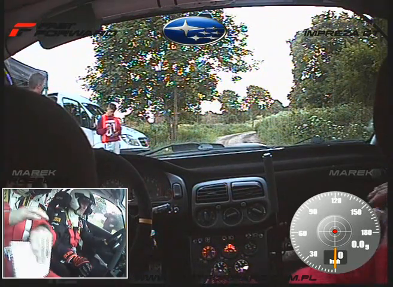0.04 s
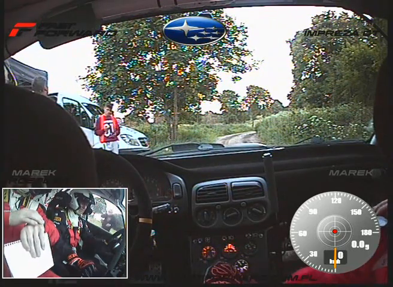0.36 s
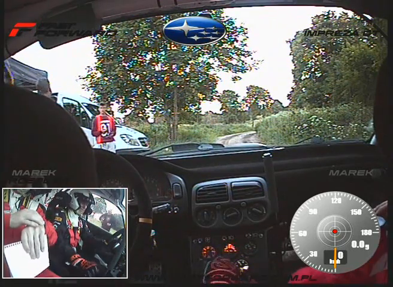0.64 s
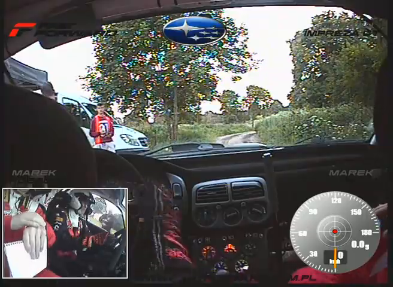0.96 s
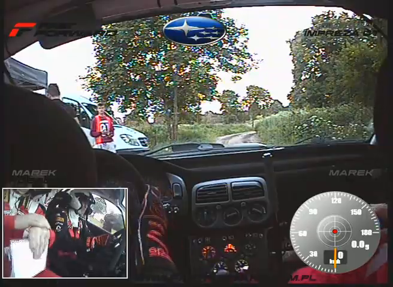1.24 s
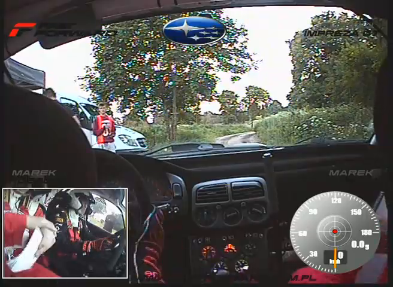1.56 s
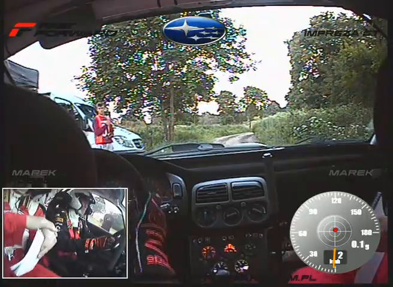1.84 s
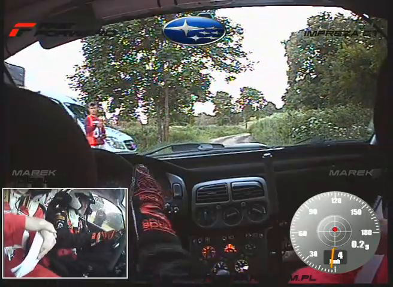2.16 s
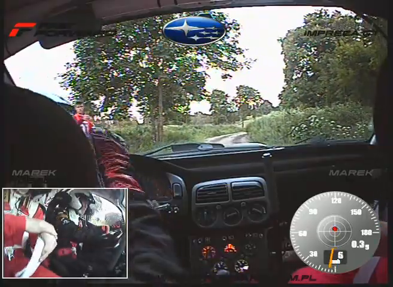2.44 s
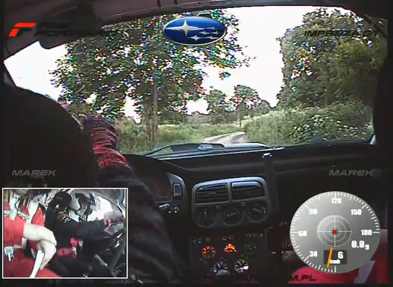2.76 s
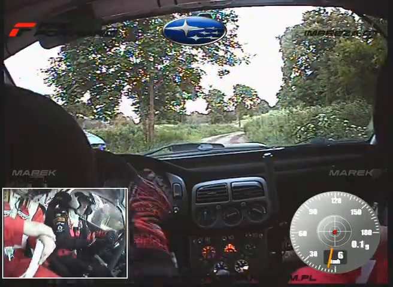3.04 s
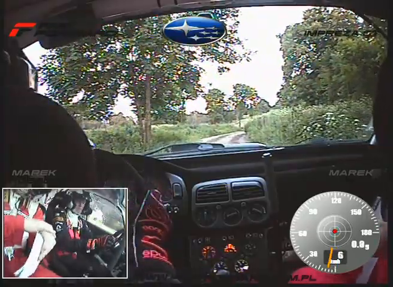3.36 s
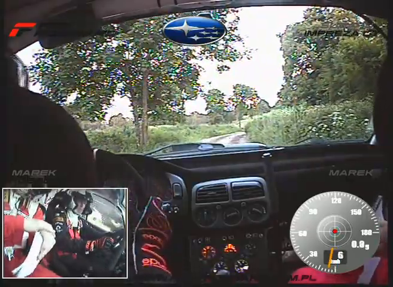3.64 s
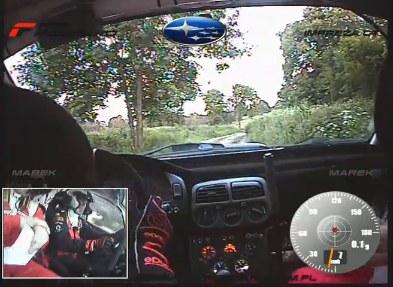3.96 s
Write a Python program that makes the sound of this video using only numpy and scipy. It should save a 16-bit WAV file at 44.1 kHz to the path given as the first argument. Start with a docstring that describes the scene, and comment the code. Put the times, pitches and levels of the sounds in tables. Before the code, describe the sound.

A rally car engine idles with a low rumble and light clatter, heard inside the cabin. At about 1 second it revs up and holds, booming, with a thin whine following its pitch and short rasps from the trim. From about 2.2 seconds the revs sag and the engine judders, quieter as the car rolls off. A brief rough surge comes near 3.7 seconds. Faint electrical hiss runs throughout.

```python
"""A rally car's flat-four engine, heard from inside: it idles, revs up, then sags and judders as the
clutch takes up and the car rolls off. The exhaust beat makes the cabin boom over rumble and clatter;
the trim rasps, and revving brings an intake growl and a thin ringing. The alternator whines in the
sound wiring, following engine speed, beside a faint electrical buzz and hiss.
The cabin sound reaches the right channel upside down (inverted), at half strength."""
import sys
import numpy as np
from scipy import signal
from scipy.fft import rfft, irfft
from scipy.io import wavfile
from scipy.ndimage import uniform_filter1d

SR = 44100
rng = np.random.default_rng(int(sys.argv[2]) if len(sys.argv) > 2 else 0)


def wav_record(signal):
    """Record a signal, one row per channel, as 16-bit PCM in the file named by sys.argv[1]."""
    frames = np.transpose(np.atleast_2d(signal))
    bounded = np.clip(frames, -1, 1)
    # unit amplitude maps onto the largest positive 16-bit level
    quanta = np.round(bounded * 32767).astype(np.int16)
    wavfile.write(sys.argv[1], SR, quanta)


N = 176400
T = np.arange(N) / SR

# what the engine is doing (time [s], state [0 idling, 1 revved, 2 rolling])
ENGINE_STATE = [(0, 0.14), (1.02, 0.044), (1.26, 0.98), (2.25, 0.97), (2.65, 1.84), (3.55, 2), (3.75, 1.68),
                (4, 1.53)]


def amp(db):
    """Turns decibels into a number to multiply by."""
    return 10 ** (np.asarray(db) / 20)


def unit(x):
    """Scales a signal to an average strength (rms) of 1."""
    return x / np.sqrt(np.mean(x ** 2) + 1e-20)


def curve(points):
    """Joins (time, value) points with straight lines."""
    return np.interp(T, *np.transpose(points))


def level_at(spectrum, hz):
    """Looks up a spectrum's level in dB at a given frequency."""
    f, db = np.transpose(spectrum)
    return np.interp(np.log(hz + 1), np.log(f + 1), db)


def noise(spectrum):
    """Noise of strength 1, its lows and highs shaped by a spectrum."""
    gain = amp(level_at(spectrum, np.fft.rfftfreq(N, 1 / SR)))
    return unit(irfft(rfft(rng.standard_normal(N)) * gain, N))


def wander(rate_hz):
    """Two smooth random wobbles, held as the real and imaginary parts of one signal."""
    f = np.fft.fftfreq(4096, N / SR / 4096)
    z = np.fft.ifft(np.exp(2j * np.pi * rng.random(len(f))) / (1 + (f / rate_hz) ** 4))
    return np.interp(T, np.linspace(0, N / SR, len(f)), unit(z.real) + 1j * unit(z.imag))


def wavering_tone(hz, width_hz):
    """Noise so narrow that it sounds like an unsteady note."""
    return (wander(width_hz / 2) * np.exp(2j * np.pi * hz * T)).real


def exhaust(cycle_hz, cycles):
    """The uneven exhaust beat: a stack of tones that slide through the cabin's resonances."""
    # tones (multiple of the cycle rate, relative level idling [dB], revved [dB], rolling [dB])
    tones = [(3, -50, -52, -43), (4, -44, -29, -36), (5, -60, -33, -47), (6, -60, -50, -50),
             (7, -55, -35, -50), (8, -38, -39, -45), (9, -56, -30, -48), (10, -58, -54, -54),
             (11, -42, -49, -48), (12, -41, -30, -51), (13, -57, -36, -49), (14, -60, -54, -55),
             (15, -52, -42, -54), (16, -46, -35, -58), (17, -49, -49, -56), (18, -64, -50, -57),
             (19, -64, -54, -54), (20, -51, -41, -55), (21, -57, -39, -54), (22, -64, -55, -52),
             (23, -55, -54, -53), (24, -44, -46, -55), (25, -54, -46, -56), (26, -64, -53, -57),
             (27, -60, -53, -57), (28, -62, -50, -57), (29, -60, -52, -57), (30, -68, -54, -57),
             (31, -48, -52, -56), (32, -52, -48, -56)]
    # how the cabin boosts or weakens each pitch (frequency [Hz], gain [dB])
    cabin_response = [(20, -18), (40, -4), (70, 0), (100, -1), (125, -3), (160, 8), (185, 0), (215, 3),
                      (245, -3), (275, -1), (320, -11), (345, -7), (362, 3), (382, -10), (450, -14),
                      (700, -24)]
    # how unevenly the fuel burns (time [s], roughness [0-1])
    roughness = [(0, .1), (1, .12), (1.18, .25), (1.35, .05), (2.1, .06), (2.4, .25), (3.5, .35),
                 (3.75, .6), (4, .6)]
    # loudness of the whole exhaust (time [s], level [dB])
    loudness = [(0, -35), (.97, -32), (1.1, -28), (1.18, -19), (1.24, -22), (1.38, -19), (1.75, -19),
                (2, -21), (2.3, -23.5), (2.5, -31.5), (2.7, -32), (3.25, -34.5), (3.35, -34), (3.5, -36.5),
                (3.75, -26.5), (4, -31)]
    state, rough = curve(ENGINE_STATE), curve(roughness)
    boom, power = np.zeros(N), np.zeros(N)
    for k, idle, revved, rolling in tones:
        db = idle + (revved - idle) * np.clip(state, 0, 1) + (rolling - revved) * np.clip(state - 1, 0, 1)
        gain = amp(db + level_at(cabin_response, k * cycle_hz))
        # every fourth tone stays in step with the firings
        phase = np.pi + rng.uniform(-np.pi, np.pi) * (k % 4 > 0)
        tone = np.exp(1j * (2 * np.pi * k * cycles + phase))
        boom += gain * (tone * (1 + rough * wander(rate_hz=5.7))).real
        power += gain ** 2 * (.5 + rough ** 2)
    return boom / np.sqrt(power) * amp(curve(loudness))


def cabin_drone():
    """The drivetrain shakes the cabin's air, which hums at its main resonance."""
    # loudness of the hum (time [s], level [dB])
    loudness = [(0, -40), (.95, -42), (1.17, -23.5), (1.35, -38.5), (2.15, -36.5), (2.35, -24.5),
                (2.55, -30), (2.75, -48), (3.05, -41), (3.45, -41.5), (3.8, -31.5), (4, -30.5)]
    return amp(curve(loudness)) * wavering_tone(hz=159.9, width_hz=31.5)


def rumble_and_clatter(firings):
    """The car's body rumbles and moving parts clatter, both swelling a little at each firing."""
    # tone colour of each (frequency [Hz], relative level [dB])
    rumble_spectrum = [(12, -25), (25, -9), (45, 2.5), (80, 4), (105, 1.5), (125, -8), (160, 1),
                       (220, -10.5), (270, -1.5), (320, -14.5), (430, -17), (560, -27.5), (1000, -57)]
    clatter_spectrum = [(150, -10.5), (300, 4.5), (430, 5.5), (520, -3), (680, -4), (850, -6.5),
                        (1100, -9.5), (1500, -6), (1680, -8), (1850, -13.5), (2400, -15), (3300, -21),
                        (5000, -25.5), (7800, -30), (9000, -36), (13000, -48)]
    # loudness of each (time [s], level [dB])
    rumble_loudness = [(0, -43), (.95, -44), (1.15, -32), (1.35, -41), (2.1, -36), (2.35, -28.5),
                       (2.7, -37), (3.5, -44), (3.75, -29.5), (4, -33.5)]
    clatter_loudness = [(0, -44.5), (1, -44.5), (1.4, -42), (2.2, -44), (2.7, -43.5), (3.5, -44.5),
                        (3.8, -43), (4, -44)]
    depth, decay = 0.078, 0.4  # decay is a share of the time between firings
    beat = unit(1 - depth + 2 * depth * np.exp(-(firings % 1) / decay))
    rumble = noise(rumble_spectrum) * amp(curve(rumble_loudness))
    clatter = noise(clatter_spectrum) * amp(curve(clatter_loudness))
    return beat * (rumble + clatter)


def alternator(hz):
    """Ripple in the charging current makes a whine that gets brighter as the engine speeds up."""
    # the whine's tones at top speed (multiple of the pitch, relative level [dB])
    harmonics = [(1, 0), (2, -4), (3, -5.5), (4, -6), (5, -7), (6, -13), (7, -7)]
    # loudness of the lowest tone (time [s], level [dB])
    loudness = [(0, -70.5), (1, -70), (1.2, -63.5), (1.35, -63), (2.1, -64.5), (2.4, -65.5), (2.65, -66),
                (3, -66.5), (3.2, -69.5), (3.65, -73), (4, -69)]
    pitch_jitter, flutter, db_per_octave = 0.00202, 0.15, 6
    turns = np.cumsum(hz * (1 + pitch_jitter * wander(rate_hz=38).real)) / SR
    brightness = amp(db_per_octave * np.log2(hz / hz.max()))
    whine = np.zeros(N)
    for k, db in harmonics:
        gain = amp(db) * (brightness if k > 1 else 1)
        whine += gain * np.sin(2 * np.pi * k * turns) * (1 + flutter * wander(rate_hz=33).real)
    return np.sqrt(2) * whine * amp(curve(loudness))


def wiring():
    """Electrical noise in stereo: a pulsing high tone, a hiss that dips in its rhythm, and a buzz."""
    # tone colour of the hiss (frequency [Hz], relative level [dB])
    hiss_spectrum = [(100, 5), (1000, 5), (2500, 4), (4500, 0.5), (10000, -0.5), (12500, -0.5)]
    # steady tones of the buzz (frequency [Hz], level [dB])
    buzz_tones = [(4500, -87), (6000, -88), (7500, -88), (9000, -87), (10500, -88), (12000, -88)]
    pulse_db, hiss_db = (-73.5, -67), (-62, -61.5)  # left, right
    tone_hz, pulses_per_s, on_share = 11522, 20.15, .43
    place = T * pulses_per_s % 1  # runs from 0 to 1 once per pulse
    gate = uniform_filter1d(1. * (abs(place - .5) < on_share / 2), size=100)
    pulses = amp(pulse_db)[:, None] * np.sqrt(2) * gate * np.sin(2 * np.pi * tone_hz * T)
    flicker = 1 + 0.1 * wander(rate_hz=93).real
    dip = 1 - 0.47 * np.exp(-((place - 0.85) / 0.081) ** 2)
    hiss = np.array([amp(db) * noise(hiss_spectrum) for db in hiss_db]) * unit(flicker * dip)
    buzz = sum(amp(db) * np.sqrt(2) * np.sin(2 * np.pi * hz * T) for hz, db in buzz_tones)
    return pulses + hiss + buzz


def trim_rasps():
    """The cabin's trim panels vibrate in short, rasping bursts."""
    # bursts (middle [s], length [s], peak level [dB])
    rasps = [(0.558, 0.093, -57), (1.453, 0.13, -54), (1.666, 0.11, -54), (1.98, .12, -58),
             (2.27, 0.17, -54.5), (3.86, 0.12, -55)]
    # their tone colour (frequency [Hz], relative level [dB])
    spectrum = [(800, -40), (1800, 1), (2500, 3), (3100, 7), (3800, -7), (6000, -6.5), (13000, -24)]
    level = sum(amp(db) * np.exp(-(2 * (T - middle) / length) ** 2) for middle, length, db in rasps)
    return level * noise(spectrum) * unit(1 + 0.19 * wander(rate_hz=37).real)


def intake_growl(firings, revved):
    """The engine gulps air in throaty puffs, one per firing, loudest when revved."""
    # tone colour of the puffs (frequency [Hz], relative level [dB])
    spectrum = [(300, -22), (480, -2), (660, 4), (800, -7), (1000, -11.5), (1600, -28.5)]
    puffs = unit(1 + np.cos(2 * np.pi * firings) / 2)
    return amp(db=-53) * revved * puffs * noise(spectrum)


def ringing(revved):
    """Thin, high tones that come up while the engine is revved."""
    # ringing tones (frequency [Hz], width [Hz], level when fully revved [dB])
    tones = [(9060, 90, -73), (10680, 90, -73), (11700, 96, -82)]
    return revved * sum(amp(db) * wavering_tone(hz, width) for hz, width, db in tones)


def scene():
    """Mixes left and right; one engine speed sets the pace of exhaust, clatter, growl and whine."""
    # engine speed, given as the alternator's pitch (time [s], pitch [Hz])
    speed = [(0, 1500), (.97, 1506), (1.06, 1782), (1.12, 2089), (1.2, 2506), (1.26, 2837), (1.33, 3003),
             (1.41, 3042), (1.6, 2981), (1.83, 2918), (2, 2837), (2.12, 2772), (2.24, 2627), (2.4, 2182),
             (2.51, 2289), (2.65, 2334), (2.83, 2247), (3.03, 2072), (3.18, 1906), (3.35, 1747),
             (3.6, 1625), (3.74, 1872), (3.85, 1552), (4, 1445)]
    whine_hz = uniform_filter1d(curve(speed), size=1800, mode="nearest")
    cycle_hz = whine_hz / 167.3  # the whine vibrates this many times per engine cycle
    cycles = np.cumsum(cycle_hz) / SR
    firings = 4 * cycles  # each of the four cylinders fires once per cycle
    revved = np.clip(1 - abs(curve(ENGINE_STATE) - 1), 0, 1)
    cabin = exhaust(cycle_hz, cycles) + intake_growl(firings, revved) + cabin_drone()
    cabin += rumble_and_clatter(firings) + trim_rasps() + ringing(revved)
    whine = alternator(whine_hz)
    left = cabin + amp(db=-12) * whine
    right = whine - amp(db=-6) * cabin
    return np.array([left, right]) + wiring()


def record(dry):
    """Cuts away the very highest treble."""
    low_pass = signal.firwin(401, cutoff=12900, window=("kaiser", 9), fs=SR)
    return signal.oaconvolve(dry, low_pass[None], "same")


dry = scene()
out = record(dry)
wav_record(out)
```